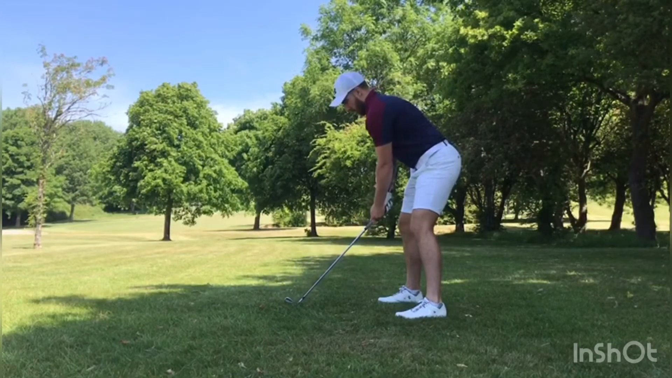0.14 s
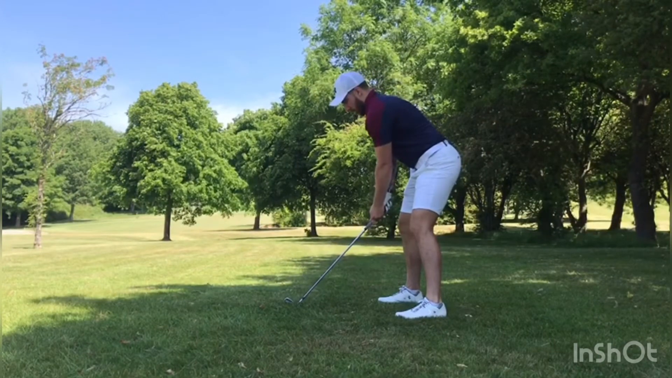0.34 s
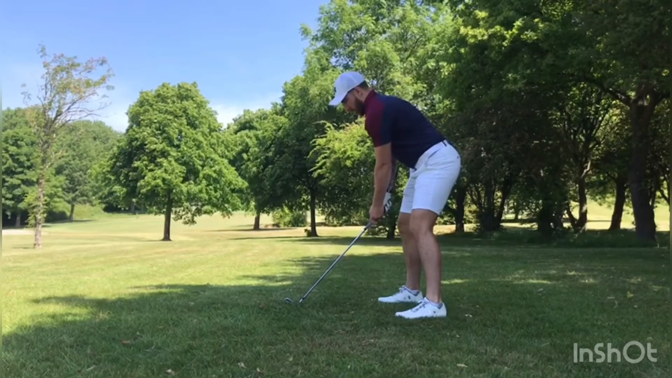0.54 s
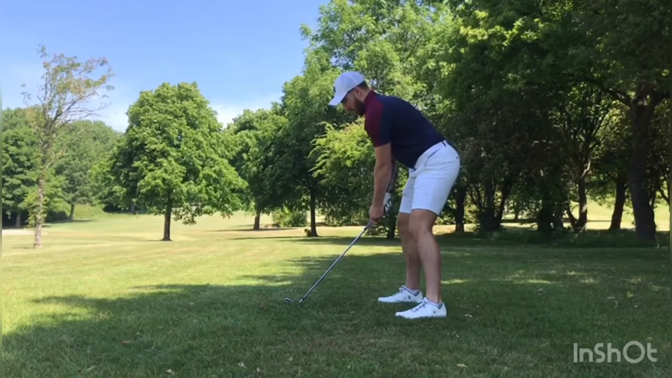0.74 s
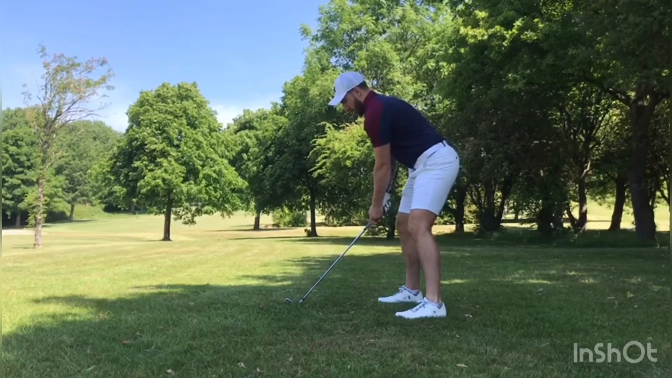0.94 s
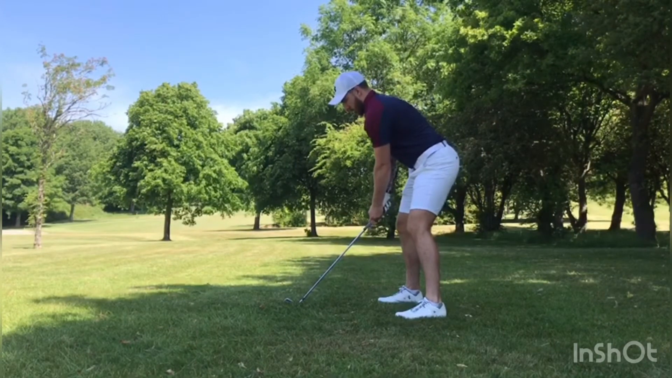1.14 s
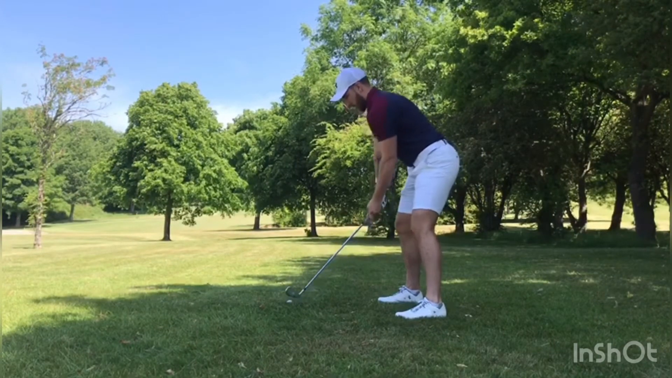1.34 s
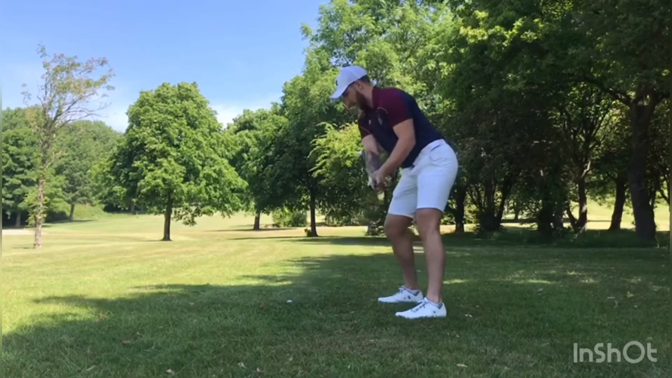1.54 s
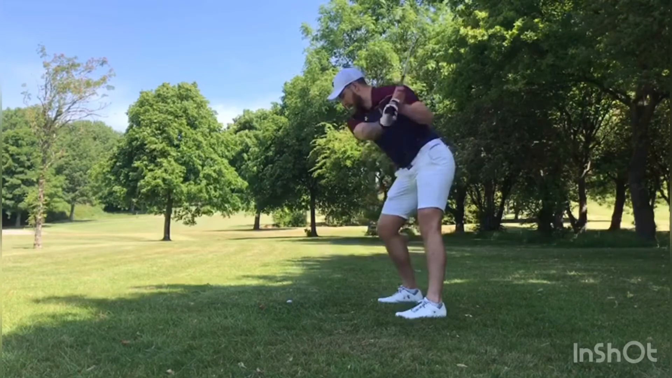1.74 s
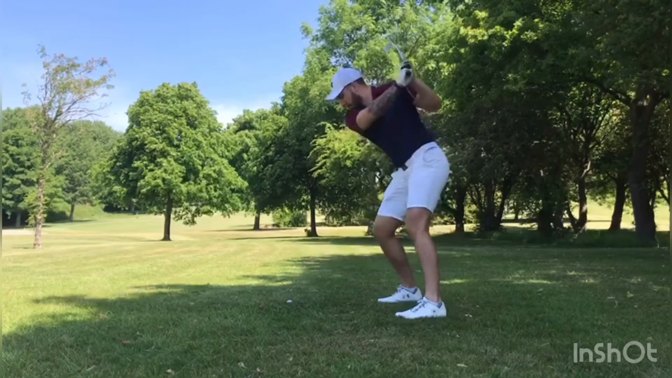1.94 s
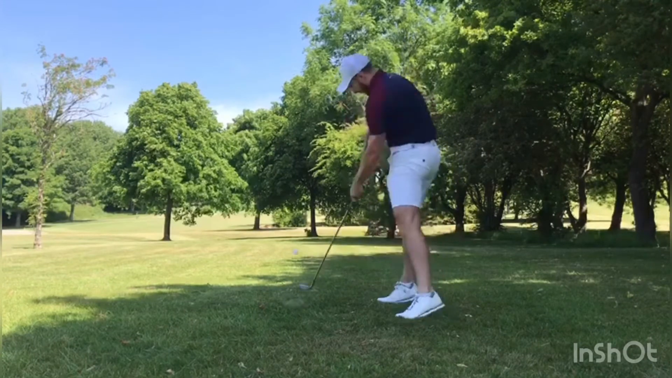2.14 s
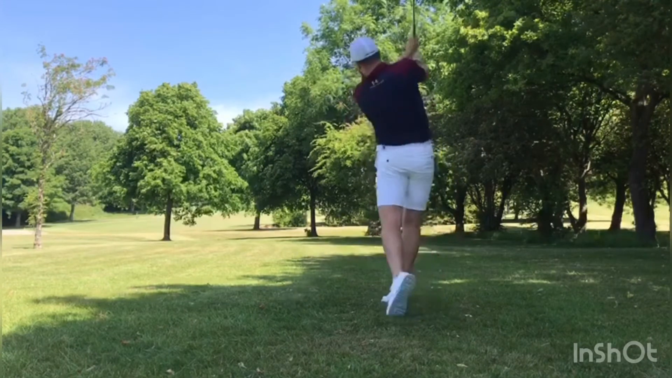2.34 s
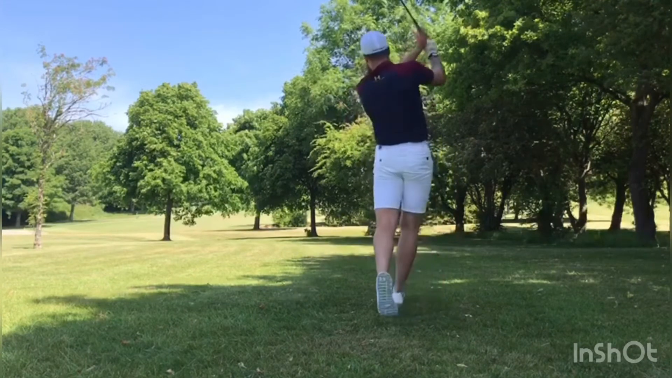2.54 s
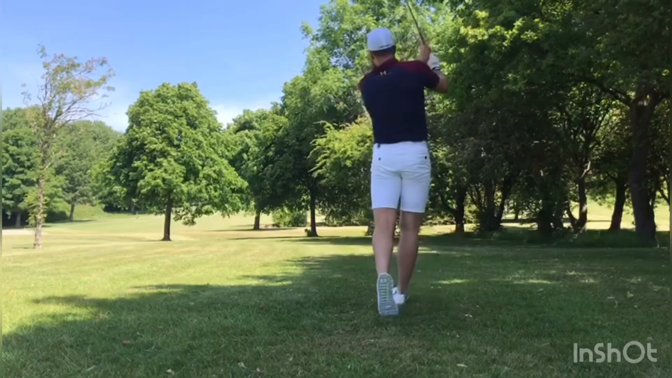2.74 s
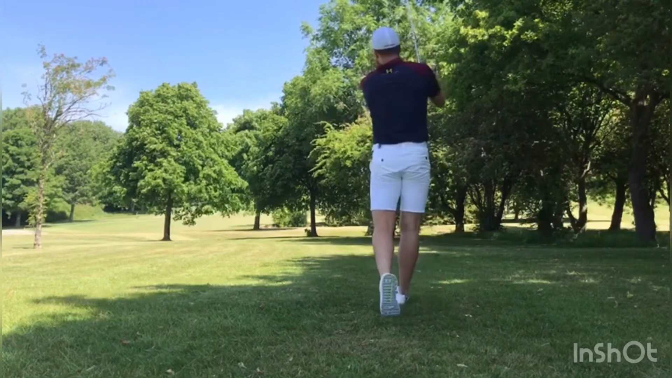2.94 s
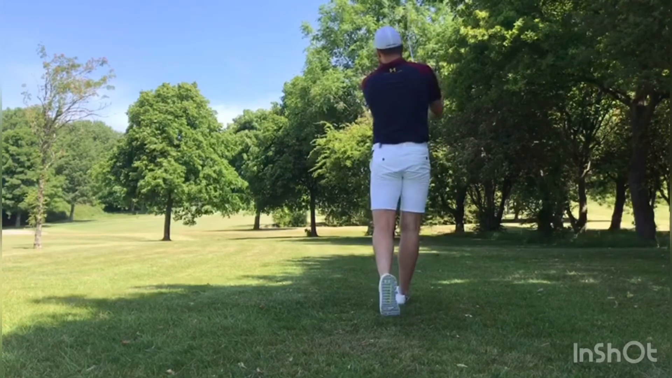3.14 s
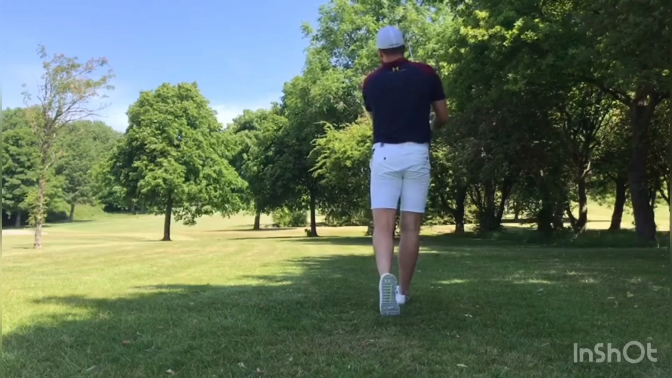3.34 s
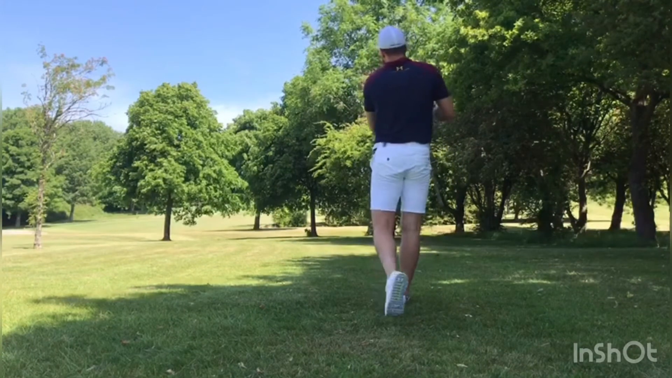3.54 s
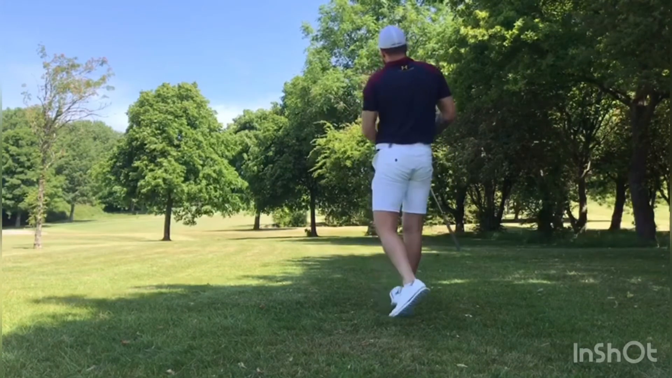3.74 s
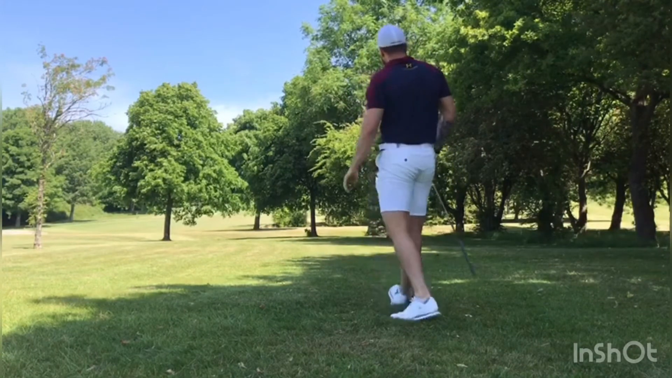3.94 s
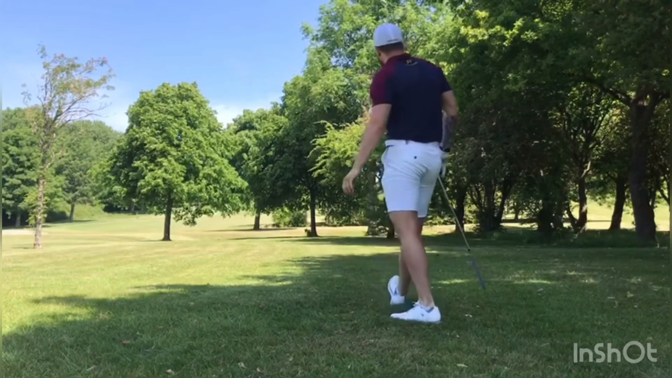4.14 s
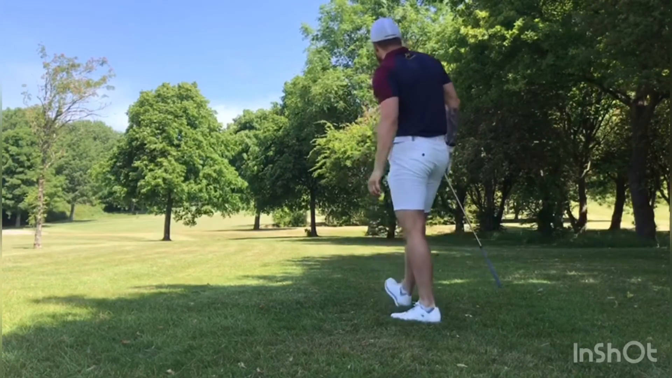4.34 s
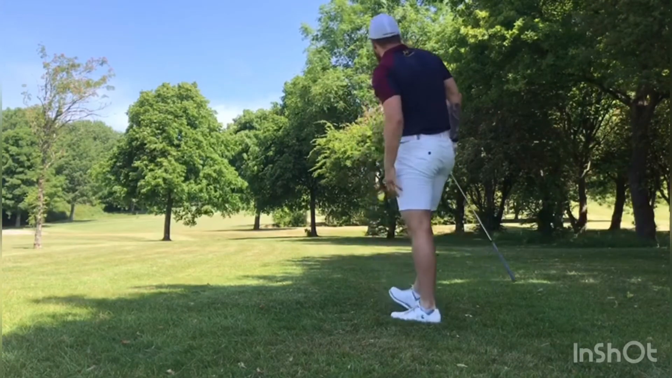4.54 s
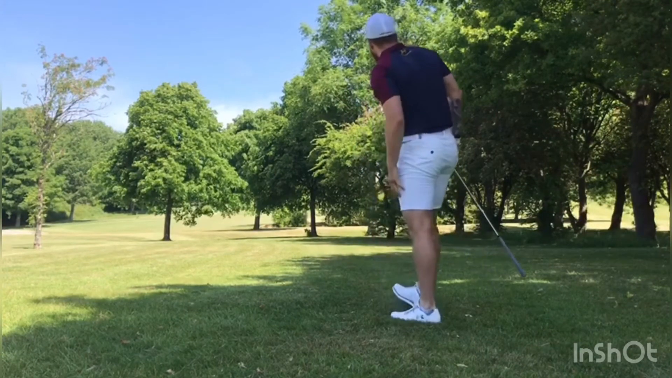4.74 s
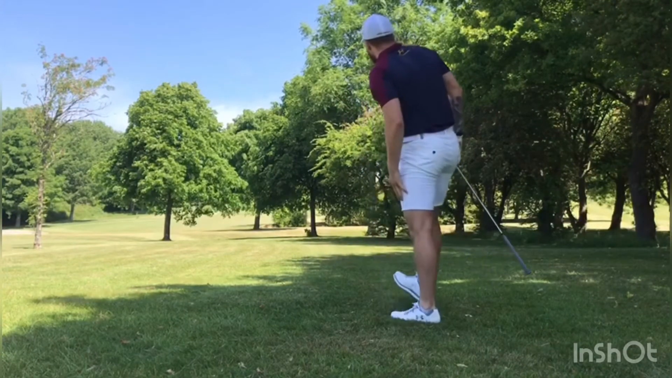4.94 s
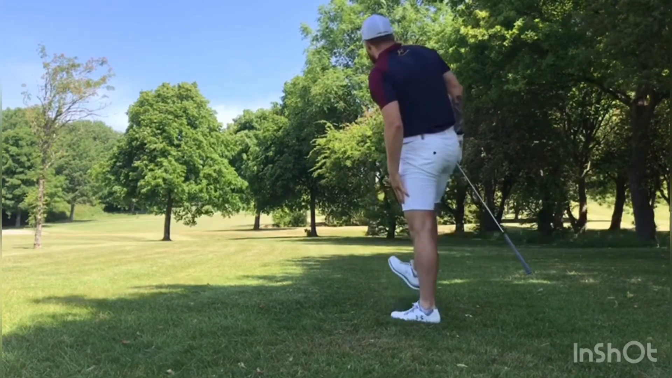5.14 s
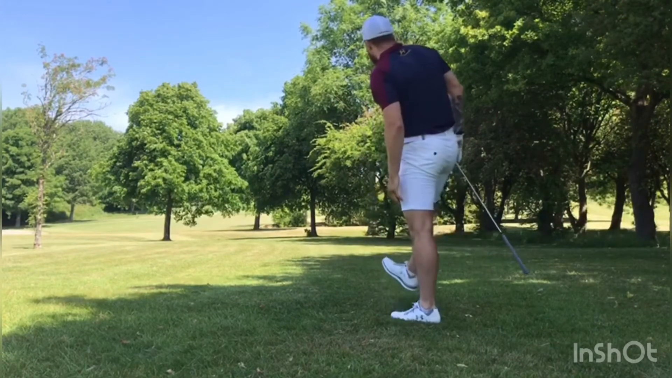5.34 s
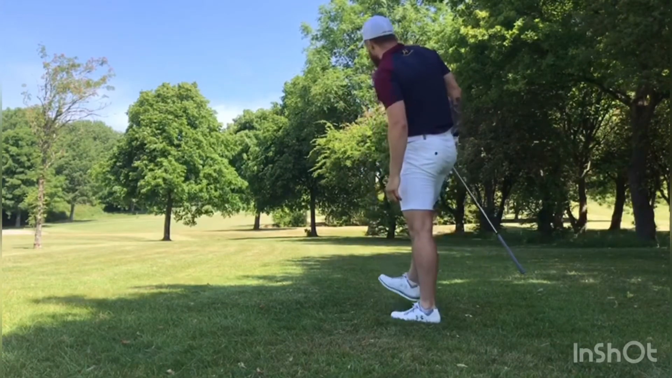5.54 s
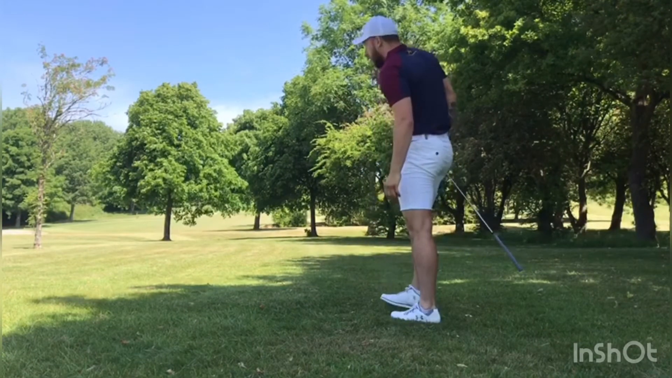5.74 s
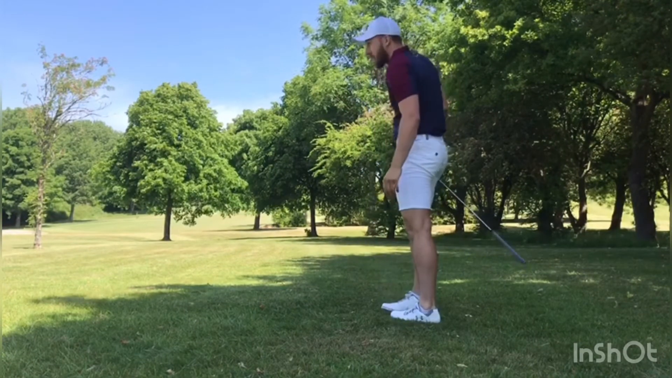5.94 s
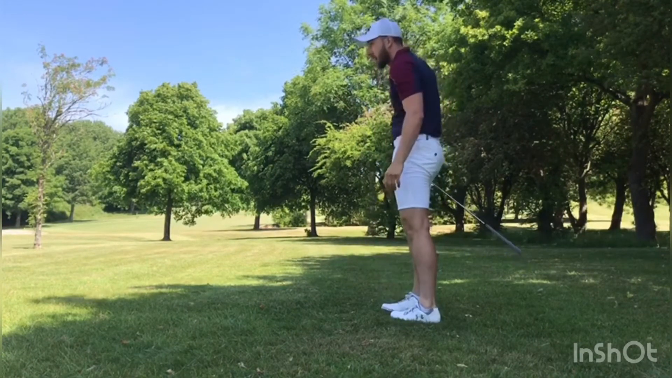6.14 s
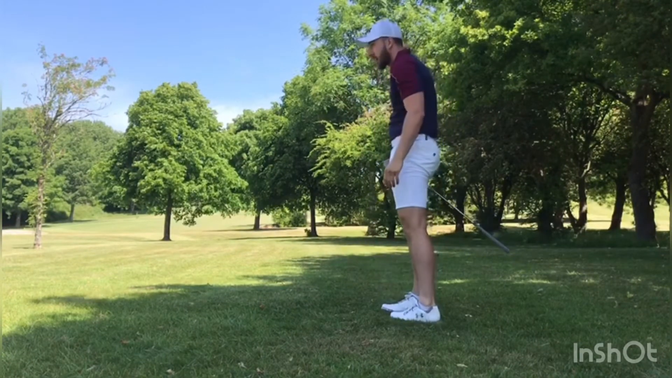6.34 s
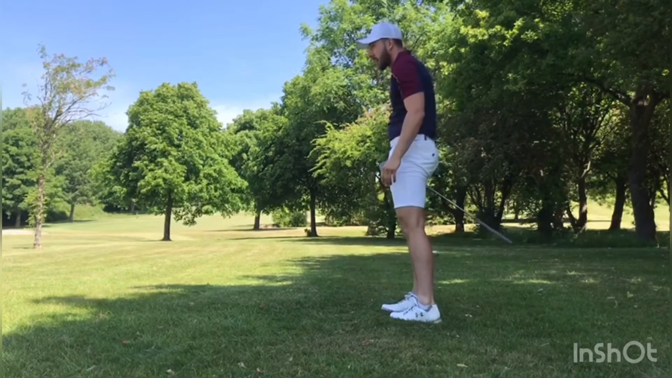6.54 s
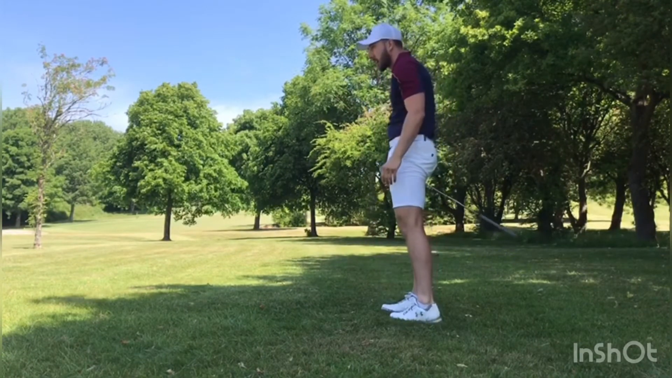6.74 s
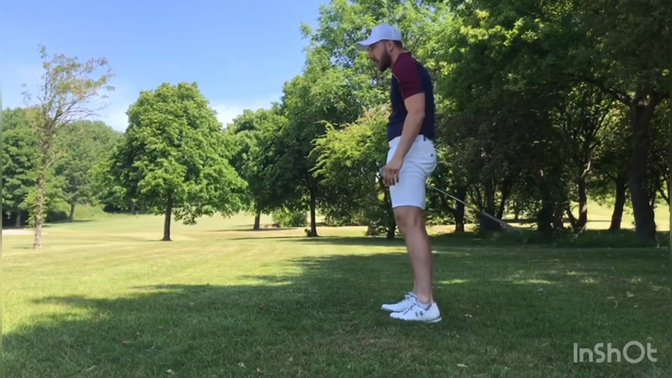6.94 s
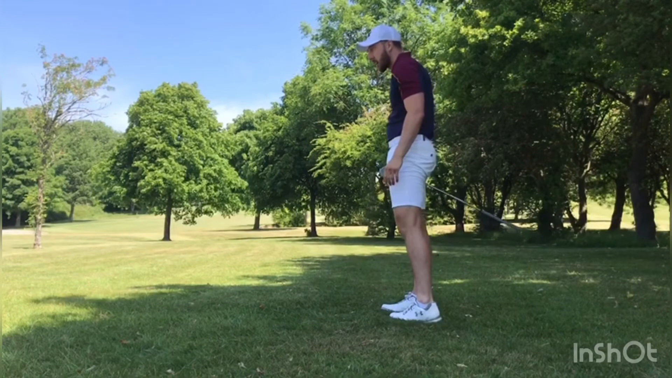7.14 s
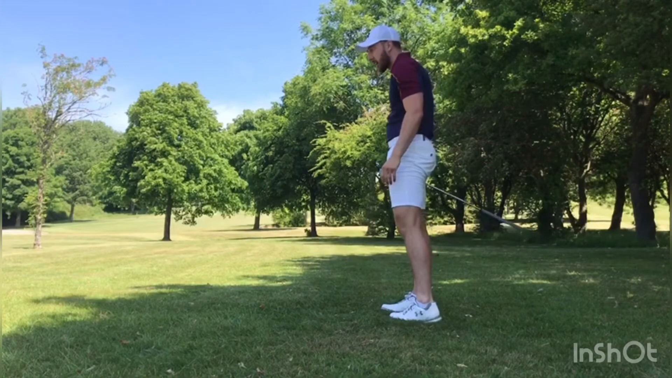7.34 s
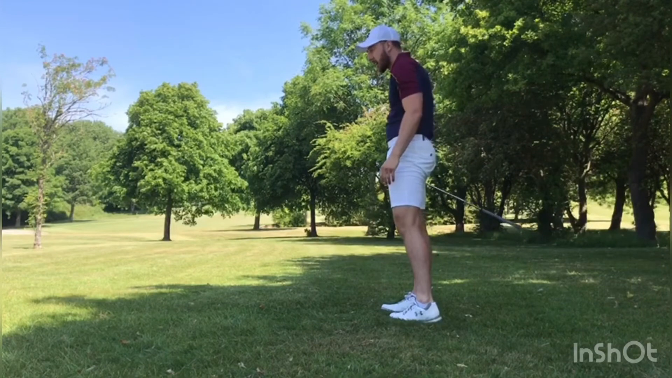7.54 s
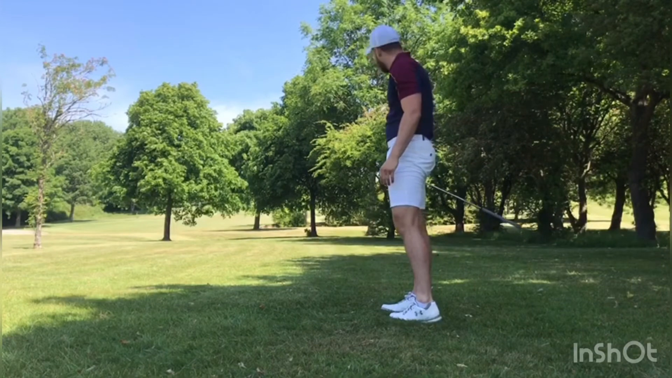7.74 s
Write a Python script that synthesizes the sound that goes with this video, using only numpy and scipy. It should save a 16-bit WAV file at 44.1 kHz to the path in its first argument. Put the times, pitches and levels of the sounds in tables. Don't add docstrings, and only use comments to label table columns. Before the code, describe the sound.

Outdoors beside trees, a faint low traffic rumble and breeze lie under scattered thrush whistles, chirps and a quick twitter. About two seconds in, a brief club swish ends in torn turf and a very loud, dry crack, scattered back by the trunks. Tiny soil ticks follow, then a soft shoe rub. Later a finch trills rapidly, and a thrush whistles again at the end. A fixed camera microphone adds faint high clicks.

```python
import sys
import numpy as np
from scipy import signal
from scipy.fft import rfft, irfft
from scipy.io import wavfile
from scipy.ndimage import uniform_filter1d

SR = 44100
rng = np.random.default_rng(int(sys.argv[2]) if len(sys.argv) > 2 else 0)


def voltage_ratio(level):
    return 10 ** (np.asarray(level, float) / 20)


def wav_record(signal):
    frames = np.transpose(np.atleast_2d(signal))
    bounded = np.clip(frames, -1, 1)
    quanta = np.round(bounded * 32767).astype(np.int16)
    wavfile.write(sys.argv[1], SR, quanta)


N = 343098
T = np.arange(N) / SR


def rms_one(x):
    return x / np.sqrt(np.mean(x ** 2) + 1e-20)


def hiss():
    return rng.standard_normal(N)


def in_time(rows, off=None):
    s, *columns = np.transpose(rows)
    return [np.interp(T, s, c, left=off, right=off) for c in columns]


def band(x, low_hz, high_hz, order=2):
    return signal.sosfilt(signal.butter(order, [low_hz, high_hz], "band", fs=SR, output="sos"), x)


def coloured(points):
    hz, level_db = np.transpose(points)
    pitch_hz = np.maximum(np.arange(N // 2 + 1) * SR / N, 1)
    gain = voltage_ratio(np.interp(np.log(pitch_hz), np.log(hz), level_db))
    return rms_one(irfft(rfft(hiss()) * gain, N))


def drift(rate_hz):
    r = np.exp(-2 * np.pi * rate_hz / SR)
    wander = signal.lfilter([1], [1, -2 * r, r * r], rng.standard_normal(N + SR))
    return rms_one(wander[SR:])


def ring(clicks, hz, t60_s):
    r, w = voltage_ratio(-60 / (t60_s * SR)), 2 * np.pi * hz / SR
    return signal.lfilter([0, np.sin(w)], [1, -2 * r * np.cos(w), r * r], clicks + 1e-18)


def clicks_at(rows):
    out = np.zeros(N)
    out[[round(s * SR) for s, db in rows]] = voltage_ratio([db for s, db in rows])
    return out


def struck(blows, modes):
    return sum((-1) ** k * voltage_ratio(db) * ring(blows, hz, t60) for k, (hz, db, t60) in enumerate(modes))


def tone(hz):
    return np.sqrt(2) * np.sin(2 * np.pi * np.cumsum(hz) / SR)


def gate(rows, fade_s):
    return np.clip(np.minimum(T - rows[0][0], rows[-1][0] - T) / fade_s, 0, 1)


def slurs(rows):
    out, waver_hz = np.zeros(N), 60 * drift(140)
    for s, length, start_hz, middle_hz, end_hz, db in rows:
        u = np.linspace(0, 1, int(length * SR))
        here = slice(int(s * SR), int(s * SR) + len(u))
        bend = np.interp(u, [0, .5, 1], [start_hz, middle_hz, end_hz])
        hz = uniform_filter1d(bend, len(u) // 4, mode="nearest")
        swell = np.sin(np.pi * u) ** 0.34
        out[here] += voltage_ratio(db) * swell * tone(hz + waver_hz[here])
    return out * voltage_ratio(2.0 * drift(170) - 2.5)


def woods(x, wet_db):
    age_s = T[:SR]
    tail = rng.standard_normal(SR) * voltage_ratio(-60 * age_s / 0.73) * (age_s > .012)
    return x + voltage_ratio(wet_db) * signal.fftconvolve(x, tail / np.sqrt(np.sum(tail ** 2)))[:N]


def patchy(x, depth_db):
    _, _, cells = signal.stft(x, SR, nperseg=512)
    field = uniform_filter1d(rng.standard_normal(cells.shape), size=5, axis=0)
    field = uniform_filter1d(field, size=9, axis=1)
    return signal.istft(cells * voltage_ratio(depth_db * rms_one(field)), SR, nperseg=512)[1][:N]


def air():
    # pitch_hz [Hz], level_db [dB per Hz]
    air_colour = [(12, -46), (20, -22.5), (39, -1.5), (60, 2), (74, -1.5), (92, -6.5), (308, -16.5),
                  (414, -20.5), (747, -21.5), (977, -19.5), (2310, -28), (3840, -29.5), (5020, -35),
                  (11200, -41.5), (12200, -26.5), (15800, -77), (22000, -120)]
    # start_s [s], rumble_db [dB]
    gusts = [(0.0, -60), (1.1, -59), (1.15, -66), (1.41, -59), (1.56, -68), (1.65, -56), (2.06, -62),
             (2.12, -38), (2.19, -66), (2.27, -60), (3.16, -63), (4.33, -58), (4.53, -64), (5.03, -59),
             (5.07, -47), (5.13, -62), (7.76, -60), (7.78, -63)]
    # start_s [s], level_db [dB]
    puffs = [
        (5.056, -48),
    ]
    bed = voltage_ratio(-59) * coloured(air_colour)
    low = signal.sosfilt(signal.butter(2, 150, fs=SR, output="sos"), bed)
    rumble = rms_one(low) * voltage_ratio(in_time(gusts)[0] + 2.1 * drift(8))
    leaves = patchy(bed - low, 1.2) * voltage_ratio(.3 * drift(2.8))
    knocks = ring(ring(clicks_at(puffs), 64.5, 0.065), 66, 0.082) * 0.028
    return rumble + leaves + knocks


def held(s, length, start_hz, end_hz, db):
    attack_s, release_s, edge_db = 0.047, .025, -14
    times = s + np.array([0, attack_s, length - release_s, length])
    hz = start_hz + (end_hz - start_hz) * (times - s) / length
    return np.transpose([times, hz, db + edge_db * np.array([1, 0, 0, 1])])


def whistles():
    # start_s [s], pitch_hz [Hz], level_db [dB]
    winding = [
        [(0.135, 2044, -88), (0.147, 2050, -59.5), (0.209, 2224, -58.5), (0.231, 2895, -49.5),
         (0.245, 2870, -51)],
        [(0.71, 1685, -72), (0.738, 2135, -59.5), (0.782, 2296, -54), (0.878, 1990, -64.5), (0.91, 1682, -78)],
        [(3.66, 5910, -77), (3.674, 4600, -69), (3.686, 4180, -56.5), (3.702, 4350, -67), (3.722, 4680, -70)],
        [(3.785, 4500, -77), (3.794, 4380, -64), (3.838, 4310, -66), (3.856, 3609, -60.5), (3.9, 3720, -72)],
        [(7.025, 2000, -68), (7.075, 1730, -58.5), (7.119, 1868, -65.5), (7.151, 2136, -52), (7.247, 2037, -53),
         (7.285, 1800, -71)],
    ]
    # start_s [s], length_s [s], start_hz [Hz], end_hz [Hz], level_db [dB]
    held_notes = [
        (-.03, 0.11, 2490, 2320, -51),
        (1.005, .1, 2430, 2480, -54.5),
        (3.595, 0.089, 3300, 3260, -70.5),
        (7.374, .27, 1970, 1944, -55),
    ]
    # start_s [s], pitch_hz [Hz], level_db [dB]
    upper_note = [
        (7.355, 2478, -79),
        (7.369, 2560, -65.5),
        (7.403, 2670, -64.5),
        (7.449, 2640, -65),
        (7.47, 2614, -80),
    ]
    # start_s [s], end_s [s], flutters [per s], pitch_swing_hz [Hz], depth [0-1]
    flutters = [
        (0, .11, 55, 90, .6),
        (.72, .9, 70, 70, .45),
        (7.379, 7.51, 43, -80, 1.0),
    ]
    swing_hz, chop, out = np.zeros(N), np.ones(N), 0
    for start, end, rate, span_hz, depth in flutters:
        inside = (T >= start) & (T < end)
        turn = (T - start) * rate % 1
        fade = np.clip(3.7 * (end - T) / (end - start), 0, 1)
        swing_hz += inside * fade * span_hz * (2 * turn - 1)
        chop *= 1 - inside * fade * np.clip(depth, 0, 1) * np.cos(np.pi * turn) ** 4
    for note in winding + [held(*row) for row in held_notes]:
        hz, level_db = in_time(note)
        hz = uniform_filter1d(hz, size=400) + swing_hz + 13.0 * drift(110)
        out = out + gate(note, 0.0034) * chop * voltage_ratio(level_db) * tone(hz)
    hz, level_db = in_time(upper_note)
    return out + gate(upper_note, .008) * voltage_ratio(level_db + 3.3 * drift(60)) * tone(hz + 50 * drift(65))


def chatter(count):
    when, long, pitch, bend, size = rng.random((count, 5)).T
    hz = 2200 * 3.5 ** pitch
    db = -84 + 6.6 * size - 8.0 * pitch
    return slurs(zip(7.6 * when, 0.033 + .09 * long, hz * (0.6 + 0.24 * bend), hz, hz, db))


def camera_ticks():
    # start_s [s], peak_db [dB]
    ticks = [(0.1253, -59), (0.9273, -60), (1.9317, -54), (2.9357, -56), (3.9386, -54.5), (4.942, -56),
             (5.1454, -58.5), (5.9469, -58.5), (6.1469, -62), (6.9517, -59)]
    return 1.9 * ring(clicks_at(ticks), 10200, 0.0012)


def chirps():
    # start_s [s], length_s [s], start_hz [Hz], end_hz [Hz], level_db [dB]
    glides = [(.372, .041, 6700, 8800, -85), (.47, 0.025, 3080, 3010, -63.5),
              (1.045, 0.029, 3750, 3530, -71), (1.24, .045, 2700, 4460, -67),
              (1.243, 0.023, 7060, 8540, -73), (1.29, .052, 4550, 2640, -72),
              (1.365, 0.017, 2460, 2950, -63), (1.876, .009, 4970, 3200, -65.5),
              (3.46, 0.04, 3720, 3720, -75.5), (4.045, .035, 2950, 2945, -65.5),
              (4.02, 0.028, 3720, 3580, -68), (4.115, .035, 3450, 3400, -59),
              (4.23, 0.033, 2660, 2450, -64)]
    hooks = [(.575, 0.037, 2890, 3140, -64.5), (.635, 0.078, 4230, 3800, -67.5),
             (.984, 0.038, 4430, 3460, -57), (3.5, .036, 4770, 5150, -73), (3.795, .021, 2170, 1890, -60.5),
             (4.04, .025, 1730, 2250, -63.5), (4.11, .031, 1830, 2524, -60.5),
             (4.185, .05, 2030, 2750, -63)]
    drops = [
        (.238, 0.023, 2950, 2550, -64),
        (1.375, 0.039, 2220, 1730, -62),
        (4.19, .04, 3510, 3930, -56),
    ]
    # start_s [s], level_db [dB]
    chucks = [
        (3.93, -60),
        (5.26, -62.5),
        (5.395, -59),
        (5.595, -59.5),
    ]
    # length_s [s], start_hz [Hz], middle_hz [Hz], end_hz [Hz]
    chuck_shape = (.021, 2420, 2400, 1580)
    rows = [(s, *chuck_shape, db) for s, db in chucks]
    for table, share in [(glides, .5), (hooks, .9), (drops, 0.13)]:
        for s, length, start_hz, end_hz, db in table:
            rows.append((s, length, start_hz, start_hz + share * (end_hz - start_hz), end_hz, db))
    return slurs(rows)


def zigzag():
    # start_s [s], turn_s [s], top_hz [Hz], level_db [dB]
    strokes = [
        (.375, 0.414, 5920, -59),
        (0.437, 0.466, 4890, -58),
        (0.49, 0.519, 4340, -60.5),
        (0.537, 0.57, 4460, -63),
    ]
    base_hz, up_s, down_hz_per_s = 3393, 0.022, 234000
    rows = []
    for s, turn, top, db in strokes:
        middle = (top + base_hz) / 2
        rows.append((s, up_s, base_hz, middle + 50, top, db))
        rows.append((turn, (top - base_hz) / down_hz_per_s, top, middle - 200, base_hz, db + 3.0))
    call = band(slurs(rows), 2900, 5100)
    return call + voltage_ratio(-10) * np.roll(call, int(0.016 * SR))


def far_slides():
    # start_s [s], level_db [dB]
    slides = [
        (.645, -76),
        (.80, -76.5),
        (.94, -77),
        (1.09, -72),
        (1.25, -72),
        (1.39, -75.5),
        (1.535, -74.5),
        (1.75, -81.5),
    ]
    return slurs([(s, .055, 7000, 6200, 5200, db) for s, db in slides])


def swish():
    nearest_s, contact_s = 2.076, 2.1
    before = np.where(T < contact_s, 0, -150)
    roar_db = before - 45.5 - np.maximum(399 * (nearest_s - T), 120.5 * (T - nearest_s))
    hiss_db = before - 43.5 - 430 * np.abs(contact_s - T)
    roar = voltage_ratio(roar_db) * rms_one(band(hiss(), 250, 3200))
    return roar + voltage_ratio(hiss_db) * rms_one(band(hiss(), 1800, 9000, order=1))


def torn_turf():
    # start_s [s], level_db [dB]
    tearing = [
        (2.0990, -47),
        (2.1020, -35.5),
        (2.1030, -25),
        (2.1040, -26.5),
        (2.1065, -25.5),
        (2.1120, -29.5),
        (2.1180, -34),
        (2.1215, -61.5),
    ]
    grains = hiss() * voltage_ratio(1.0 * rng.exponential(1, N))
    grains = band(grains, 1200, 12000, order=1) + 0.92 * band(grains, 8500, 13000)
    return voltage_ratio(in_time(tearing, off=-150)[0]) * rms_one(grains)


def crack():
    # start_s [s], level_db [dB]
    snap = [
        (2.1029, -16),
        (2.1069, -8.5),
        (2.1074, -3.5),
        (2.1081, -11.5),
    ]
    # pitch_hz [Hz], level_db [dB], t60_s [s]
    face = [(3400, -18, 0.0036), (4360, -14, 0.0068), (5400, -13, 0.0038), (6707, -10.5, 0.0059),
            (9300, -3.5, 0.0032), (10800, -11, 0.0022), (11620, -10, .003)]
    # start_s [s], level_db [dB]
    knock = [
        (2.1058, -21.5),
        (2.1074, -9.5),
        (2.1082, -1.5),
        (2.1093, -11),
        (2.1172, -28),
        (2.1285, -32),
        (2.1340, -37.5),
    ]
    # pitch_hz [Hz], level_db [dB], t60_s [s]
    ball = [(80, -34, 0.11), (135, -28.5, 0.043), (263, -21.5, 0.029), (540, -12.5, 0.012),
            (890, -10.5, 0.01), (1490, -4, 0.0082), (2250, -8, 0.011), (2750, -11, 0.009)]
    return struck(clicks_at(snap), face) + struck(clicks_at(knock), ball)


def echo_gain(db, fall_db_per_s):
    trees_s, trees_end_s = 2.13, 2.325
    near = np.clip(T, trees_s, trees_end_s) - trees_s
    far = np.clip(T - trees_end_s, 0, 1)
    end_drop_db = 6 * np.clip(far / 0.025, 0, 1)
    level_db = db - fall_db_per_s * (near + 0.43 * far) - end_drop_db
    rise = np.clip((T - trees_s) / .003 + 1, 0, 1)
    return rise * (T < 2.6) * voltage_ratio(level_db)


def tree_echo():
    # pitch_hz [Hz], level_db [dB per Hz]
    echo_colour = [(120, -30), (200, -2), (391, -13.5), (433, -8.5), (622, -13), (1100, -1), (1440, -4),
                   (3180, -3), (3650, -14.5), (5910, -9.5), (12200, -18.5), (15800, -49), (22000, -120)]
    # level_db [dB], fall [dB per s]
    echo_bands = [(-49.5, 80), (-51, 59.5), (-47, 112.5), (-51.5, 122)]
    edges_hz = [(200, 1800), (1800, 3500), (3500, 7000), (7000, 12500)]
    back = coloured(echo_colour) * voltage_ratio(1.5 * drift(90))
    return sum(echo_gain(*law) * rms_one(band(back, *edge, order=4))
               for law, edge in zip(echo_bands, edges_hz))


def falling_soil():
    # start_s [s], level_db [dB]
    landings = [
        (2.285, -57),
        (2.331, -51),
        (2.365, -51),
    ]
    return ring(clicks_at(landings), 7100, 0.0016)


def heel_twist():
    # start_s [s], level_db [dB]
    rub = [
        (2.7, -86.5),
        (2.76, -69),
        (2.84, -67.5),
        (2.9, -71),
    ]
    return voltage_ratio(in_time(rub, off=-150)[0]) * rms_one(band(hiss(), 100, 850, order=1))


def trill_syllable(s, length, hz, db, buzz_db):
    attack_s, sag_hz_per_s = .022, 700
    rest = length - attack_s
    return [(s, hz + sag_hz_per_s * attack_s, db - 11, buzz_db - 13),
            (s + attack_s, hz, db, buzz_db),
            (s + length, hz - sag_hz_per_s * rest, db - 110 * rest, buzz_db - 330 * rest)]


def finch():
    # start_s [s], length_s [s], pitch_hz [Hz], level_db [dB], buzz_db [dB]
    trill_rows = [(4.084, .06, 3880, -64, -77), (4.155, .05, 3990, -59.5, -71),
                  (4.217, .108, 4220, -52.5, -66), (4.333, .1, 4460, -52, -67.5),
                  (4.44, .105, 4630, -58.5, -66), (4.552, .102, 4484, -49.5, -64.5),
                  (4.661, .108, 4574, -52, -66), (4.772, .103, 4700, -55.5, -66.5),
                  (4.891, .103, 4520, -55.5, -68), (5.003, .04, 4510, -58, -71),
                  (5.039, .11, 4460, -53.5, -74)]
    # start_s [s], chip_db [dB], sweeps_db [dB]
    syllables = [
        (4.349, 0, -5),
        (4.46, 2, 4.5),
        (4.567, 0.5, -5),
        (4.672, 2.5, 3),
        (4.783, 1, -6),
        (4.897, 0, -3),
        (5.015, -1, -6),
    ]
    # lag_s [s], length_s [s], start_hz, middle_hz, end_hz [Hz]
    syllable_parts = [(-.012, .022, 2600, 2330, 2280), (.011, .029, 6600, 8350, 8750),
                      (.005, .017, 9200, 10150, 10100), (-.014, .024, 7500, 7050, 6850)]
    part_levels = [-65, -70, -71.5, -73]
    # start_s [s], centre_hz [Hz], level_db [dB]
    flourish = [
        (5.05, 4370, -70),
        (5.07, 4180, -62),
        (5.115, 3900, -58.5),
        (5.14, 3590, -62),
        (5.17, 3400, -76),
    ]
    trill = [trill_syllable(*row) for row in trill_rows]
    hz, level_db, buzz_db = in_time([row for syllable in trill for row in syllable])
    first = (0.94 + .5 * drift(81)) * tone(hz + 30 * drift(43.0))
    second = 0.5 * drift(120) * tone(hz - 120 + 50 * drift(25.04))
    main = voltage_ratio(level_db) * rms_one(first + second)
    buzz = rms_one(band(hiss(), 6300, 7220, order=4)) * voltage_ratio(1.7 * drift(40))
    buzz += 0.3 * rms_one(band(hiss(), 8400, 10600, order=4)) * voltage_ratio(2.0 * drift(30))
    end_hz, end_db = in_time(flourish)
    end = gate(flourish, .01) * voltage_ratio(end_db) * drift(450) * tone(end_hz + 330 * drift(90))
    parts = []
    for s, chip_db, sweeps_db in syllables:
        own_levels = [chip_db, sweeps_db, sweeps_db, chip_db]
        for (lag, *shape), db, own_db in zip(syllable_parts, part_levels, own_levels):
            parts.append((s + lag, *shape, db + own_db))
    breath = sum(gate(syllable, 0.0013) for syllable in trill)
    return breath * (main + voltage_ratio(buzz_db) * buzz) + end + slurs(parts)


def pips():
    k = np.arange(6)
    low_hz = 2140 - 55 * k
    rise_hz = 560 * np.sin(np.pi * (k + 1) / 6.4) ** .8
    start_s, length_s = 6.913 + .0236 * k, .016 + 0 * k
    level_db = -64 + 2.5 * np.minimum(k, 4)
    return slurs(zip(start_s, length_s, low_hz, low_hz + rise_hz / 2, low_hz + rise_hz, level_db))


def scene():
    # start_s [s], level_db [dB]
    near_woods = [
        (0, -11),
        (4, -11),
        (7, -19),
    ]
    birds = woods(whistles() + pips(), in_time(near_woods)[0]) + woods(finch(), -11)
    birds += woods(chirps(), -6.5) + woods(zigzag(), -7.0)
    birds += woods(far_slides() + chatter(count=70), -1.5)
    shot = swish() + torn_turf() + crack() + tree_echo() + falling_soil()
    return (air() + shot + heel_twist() + birds + camera_ticks())[None]


def masked(x):
    hz, _, cells = signal.stft(x, SR, nperseg=1024)
    power = uniform_filter1d(np.abs(cells) ** 2, size=3, axis=1)
    power = uniform_filter1d(power, size=5, axis=2)
    keep = np.ones(power.shape)
    for k in np.flatnonzero((hz > 2000) & (hz < 7000)):
        below = power[:, int(k / 1.26):int(k / 1.1) + 1].max(axis=1)
        keep[:, k] = np.where(power[:, k] < below * voltage_ratio(2 * -32), .15, 1)
    return signal.istft(cells * keep, SR, nperseg=1024)[1][:, :N]


def band_limit(x):
    return signal.sosfilt(signal.butter(12, 12310, fs=SR, output="sos"), x)


def record(dry):
    rounded = .75 * np.tanh(dry / .75)
    top_cut = signal.cheby2(12, 60, 12700, fs=SR, output="sos")
    return band_limit(signal.sosfilt(top_cut, masked(rounded)))


dry = scene()
out = record(dry)
wav_record(out)
```